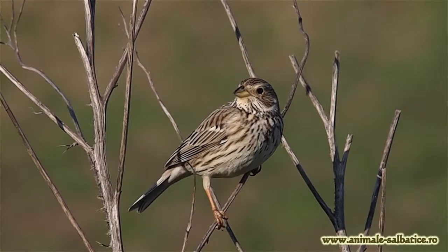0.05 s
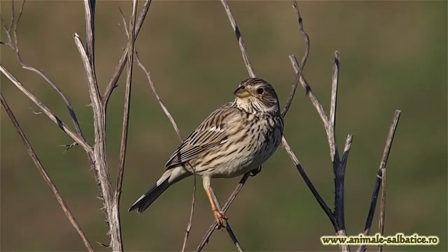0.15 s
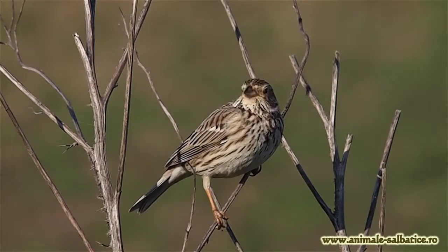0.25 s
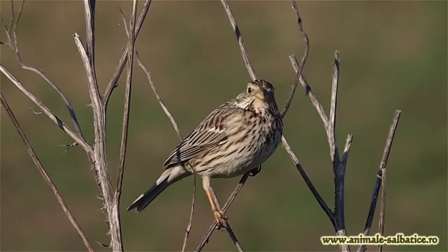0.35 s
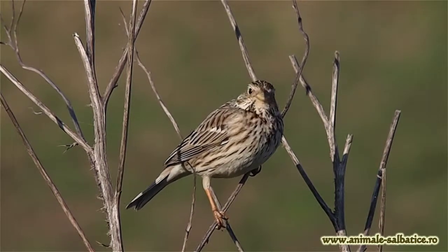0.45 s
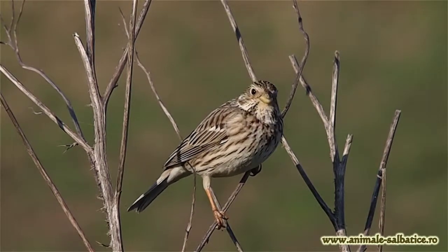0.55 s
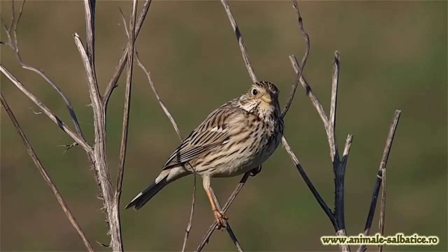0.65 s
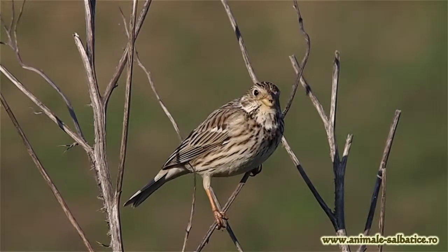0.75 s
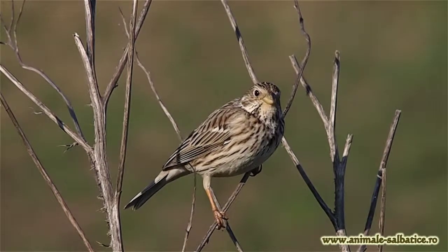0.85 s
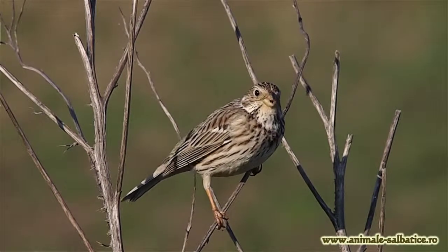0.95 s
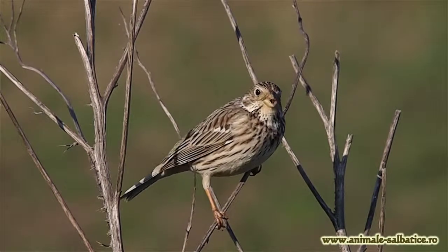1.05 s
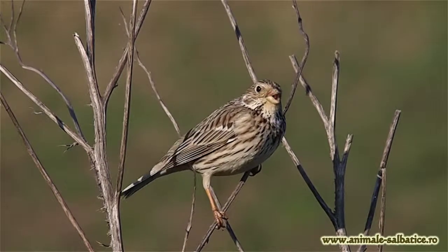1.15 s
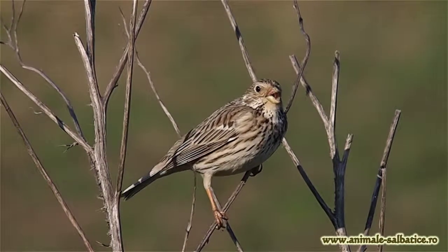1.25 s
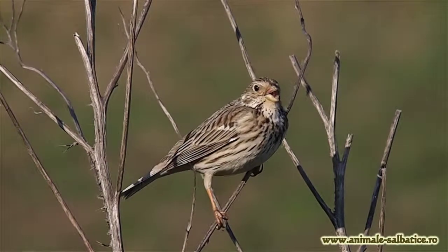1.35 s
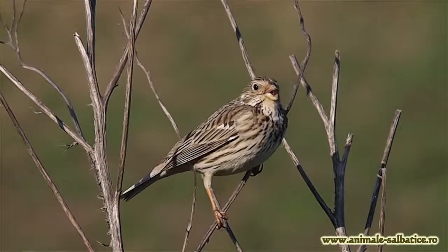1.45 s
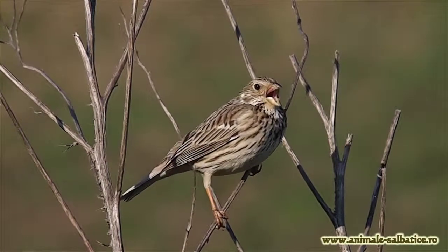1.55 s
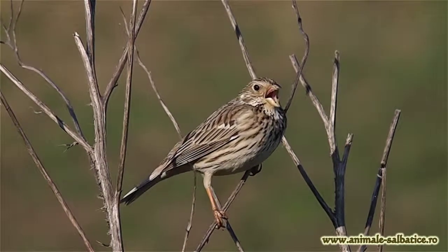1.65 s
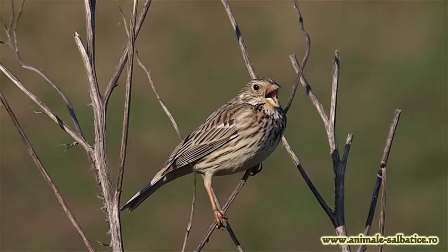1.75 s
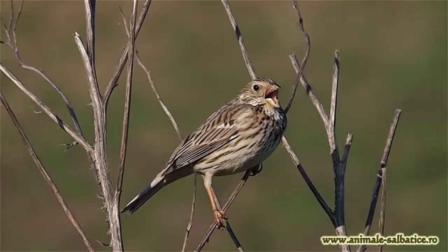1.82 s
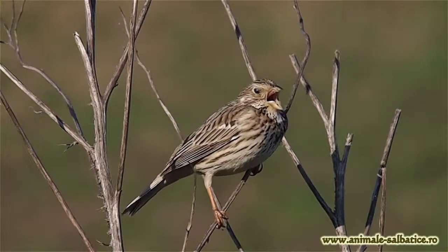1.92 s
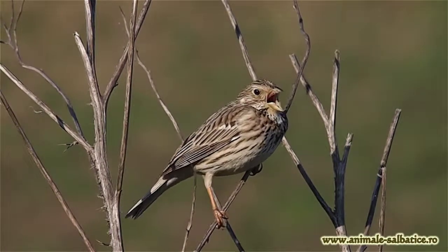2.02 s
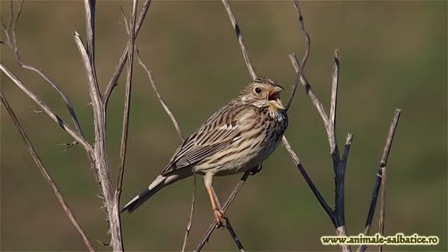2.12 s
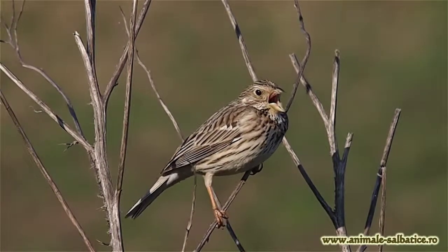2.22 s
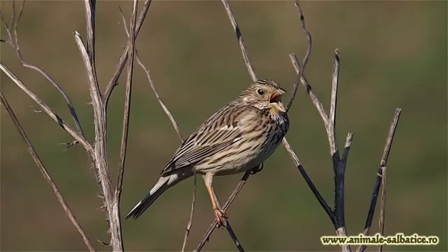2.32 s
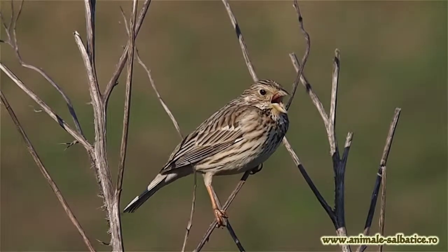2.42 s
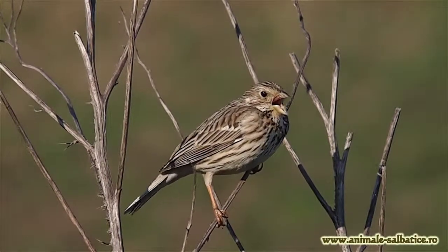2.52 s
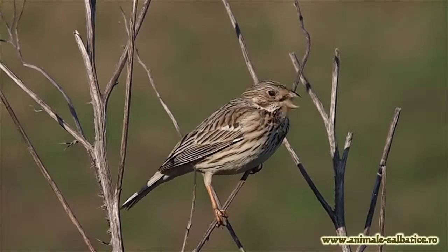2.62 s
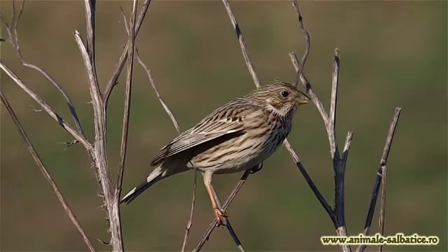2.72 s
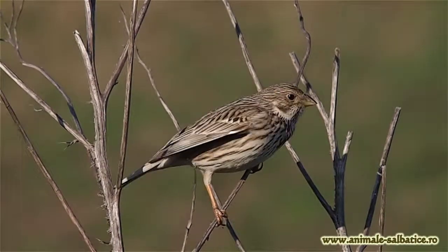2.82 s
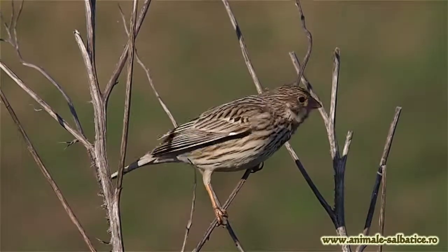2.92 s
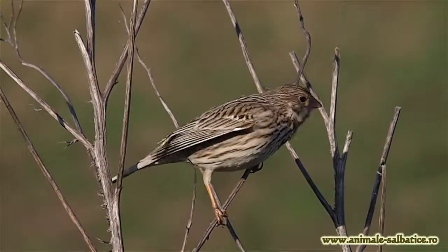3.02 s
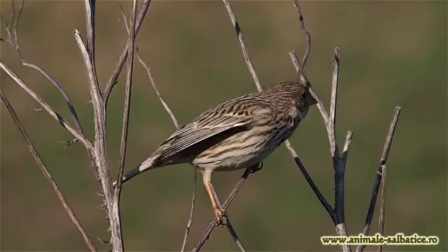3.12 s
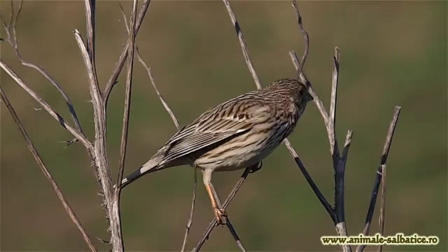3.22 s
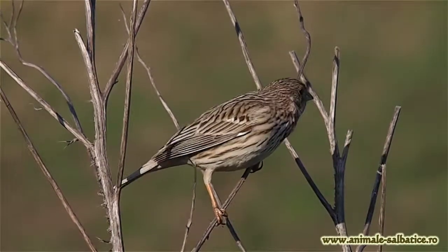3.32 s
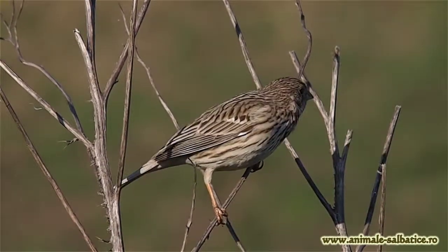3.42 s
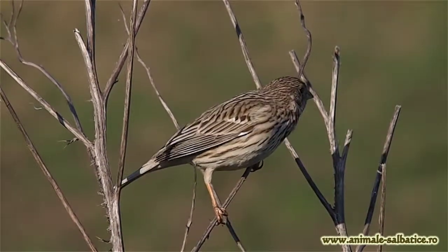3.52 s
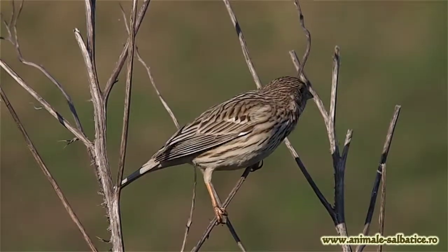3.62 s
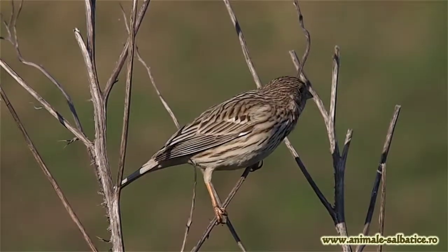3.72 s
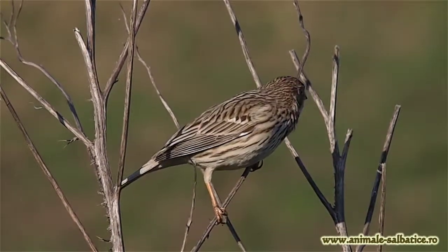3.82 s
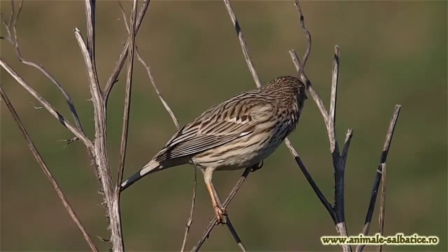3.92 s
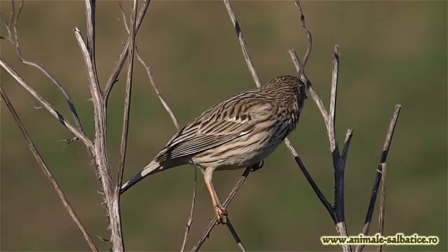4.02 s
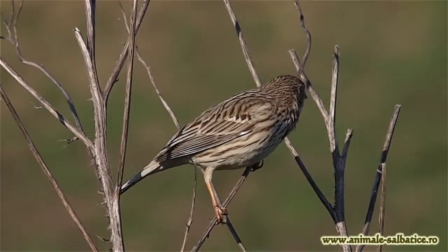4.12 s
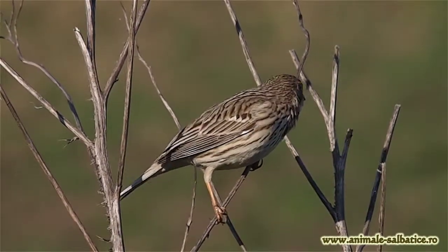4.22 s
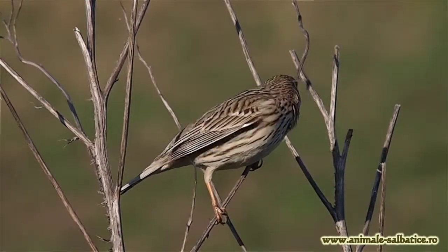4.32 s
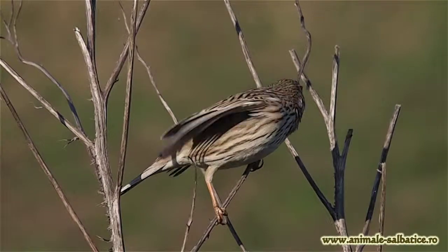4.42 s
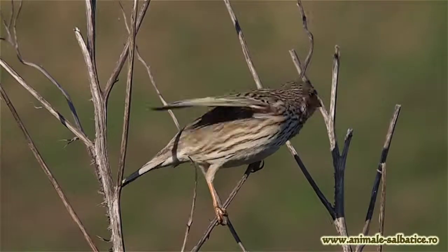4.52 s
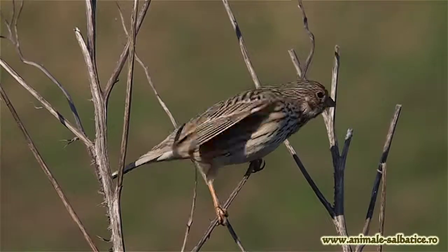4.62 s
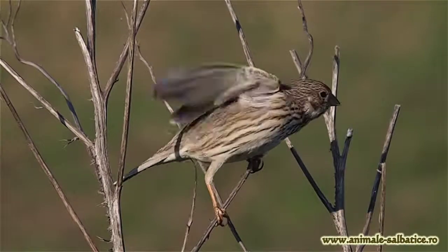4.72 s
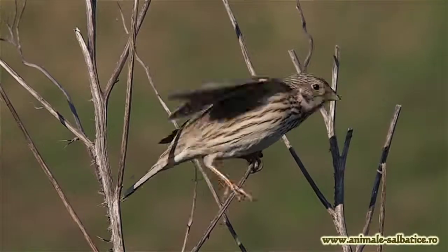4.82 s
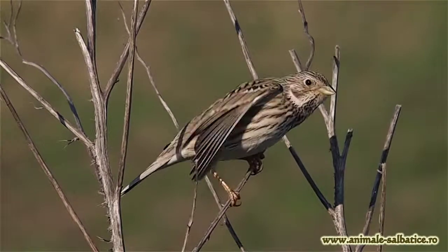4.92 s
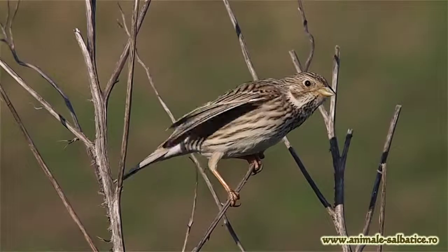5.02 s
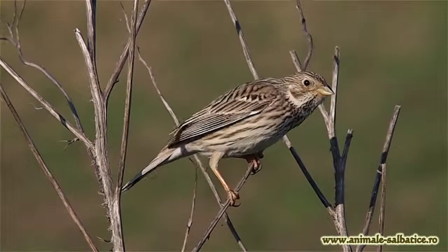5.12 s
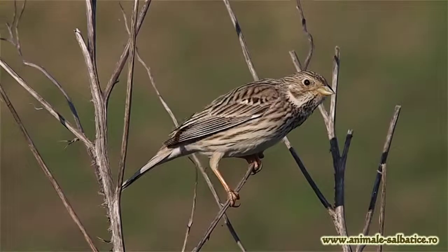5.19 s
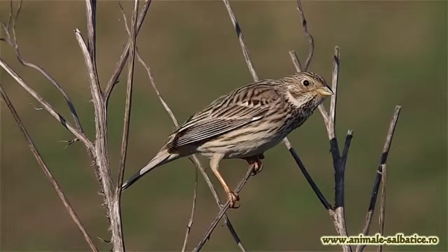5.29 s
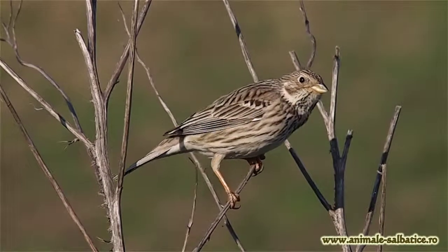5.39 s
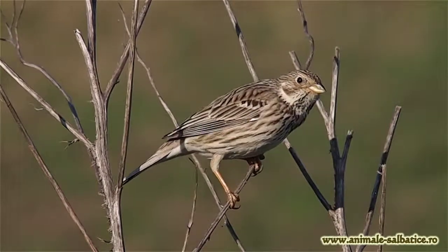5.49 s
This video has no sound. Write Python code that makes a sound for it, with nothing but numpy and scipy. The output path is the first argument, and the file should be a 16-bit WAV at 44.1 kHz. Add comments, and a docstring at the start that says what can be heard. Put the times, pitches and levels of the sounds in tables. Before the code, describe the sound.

A small bird sings one high song, quickening ticks breaking into a fast jangle, over soft air and faint distant birds.

```python
"""A corn bunting sings once in an open field: tick-and-whistle notes that get quicker and louder, then a
jangle of very fast falls, rises and stutters with two trills, fading out in a few thin chips.
Its voice box (the syrinx) has two sides: one alone gives a clean tone, both together sound hoarse.
The song echoes off the stalks and the field. Far birds call over a soft rush of air and microphone
hiss, and a limiter turns the sound down at the loudest notes."""
import sys
import numpy as np
from scipy import signal
from scipy.fft import rfft, irfft, next_fast_len
from scipy.io import wavfile
from scipy.ndimage import uniform_filter1d, map_coordinates

SR = 44100
rng = np.random.default_rng(int(sys.argv[2]) if len(sys.argv) > 2 else 0)


def inscribe(sig):
    """Save sig as 16-bit PCM at rate SR to the path in sys.argv[1].

    A 1-D sig is mono; a 2-D sig holds one channel per row.
    Samples are clipped to [-1, 1] before scaling.
    """
    pcm = np.round(np.clip(np.atleast_2d(sig).T, -1, 1) * 32767)
    wavfile.write(sys.argv[1], SR, pcm.astype(np.int16))


N = 244755
SPLIT_HZ, TOP_HZ = 4000, 15300  # where the air gives way to the hiss; upper edge of all sound


def bunting(rasp_db=-7):
    """The whole song. Notes flare as they slide through a resonance; noise rides on the hoarse ones."""
    # one note of each trill: (time into the note [s], pitch [Hz], level [dB])
    fast_note = [(0, 7120, -47), (.002, 6990, -2.5), (.0045, 6525, -0.5), (.0065, 6410, -0.5),
                 (.0078, 5340, -9.5), (.0095, 4930, -11)]
    slow_note = [(0, 8000, -22), (.002, 7600, -0.5), (.006, 7380, 3), (.0085, 6610, -1), (0.01, 6400, -2.5),
                 (0.01, 5640, -11), (0.0135, 5640, -4.5)]
    # resonances that colour the song: (centre [Hz], width [Hz], level [dB])
    resonances = [(4420, 310, -12), (5656, 302, -7), (6717, 380, -3), (7600, 287, -3.5)]
    # colour of the rasping noise: (frequency [Hz], level [dB])
    rasp_colour = [(1500, -11), (3600, -36), (4700, -2.5), (5500, 16), (8700, -25.5), (10300, 3),
                   (11800, -3), (15000, -12)]
    fast = trill(fast_note, start_s=1.6167, period_s=0.01, count=11, second=0.67, under_db=-18.5)
    slow = trill(slow_note, start_s=1.9943, period_s=0.01755, count=7, second=0.53, under_db=-17.5)
    track = np.zeros((3, N))
    for s, db, sound in opening() + jangle() + fast + slow:  # a note is (time [s], level [dB], sound)
        add(track, s, amp(db) * sound)
    tone, overtones, hoarseness = track
    body = lambda f: sum(amp(db) * 1j * f * width / (hz * hz - f * f + 1j * f * width)
                         for hz, width, db in resonances)
    rasp = amp(rasp_db) * hoarseness * noise(rasp_colour, 1250, TOP_HZ)
    return filtered(tone, body) + overtones + rasp


def syrinx(pitch, second, apart_hz=850, flutter=0.34, octave_db=-40):
    """The voice box, as rows: tone, weak octave, hoarseness. second (0-1) mixes in its second side."""
    share = np.clip(second, 0, 1) * np.ones(len(pitch))
    hoarseness = share ** 2
    phase = phase_of(pitch, jitter=0.003 + 0.06 * hoarseness)
    # the second side sounds a little higher, unsteadily, and beats with the first
    other_side = np.sin(phase_of(pitch + apart_hz, jitter=0.044))
    other_side *= 1 + flutter * wobble(1500, size=len(pitch))
    tone = np.sqrt(1 - hoarseness) * np.sin(phase) + share * other_side
    return np.array([tone, amp(octave_db) * np.sin(2 * phase), hoarseness])


def opening():
    """With more effort the ticks get louder and higher, the whistle earlier, longer and higher."""
    # each a double tick and a whistle: (time [s], effort [0-1], whistle level [dB])
    opening_notes = [(0.5599, 0.09, -22.5), (0.7739, 0.34, -13), (0.9516, 0.49, -10.5), (1.114, .73, -8),
                     (1.2475, 0.88, -6.5), (1.3659, 1, -7), (1.4726, 1, -7.5)]
    notes = []
    for s, effort, db in opening_notes:
        by_effort = lambda soft, hard: soft + effort * (hard - soft)
        notes += double_tick(s, hz=by_effort(5320, 6265), db=by_effort(-28, -3.5))
        sound = whistle(length=by_effort(0.0205, 0.031), start_hz=by_effort(3740, 3930),
                        middle_hz=by_effort(3684, 4444), end_hz=by_effort(4240, 4610), db=db)
        notes.append((s + by_effort(0.017, 0.0106), db, sound))
    return notes


def whistle(length, start_hz, middle_hz, end_hz, db, octave_db=-35, third_db=-22, hook_hz=450):
    """A clean rising whistle that swells, then stops with a small downward hook."""
    pitch, puff = arc(length, start_hz, middle_hz, end_hz, taper=0.53, lean=1.4)
    time_left = np.arange(len(pitch))[::-1] / SR
    hook = hook_hz * np.exp(-time_left / 0.0015)
    phase = phase_of(pitch - hook, jitter=0.0065)
    # the overtone at three times the pitch appears only as the bird sings harder
    overtones = amp(octave_db) * np.sin(2 * phase) + amp(third_db + 2 * db) * np.sin(3 * phase)
    return puff * np.array([np.sin(phase), overtones, np.zeros(len(phase))])


def tick(hz, fall_hz=1900, length=0.0022):
    """A downward sweep so short that it sounds like a tick."""
    pitch, puff = arc(length, hz + fall_hz / 2, hz, hz - fall_hz / 2, taper=0.54)
    return puff * syrinx(pitch, second=0.077)


def double_tick(s, hz, db, gap_s=0.0029, first_db=-3):
    """Two ticks, the first one weaker."""
    return [(s, db + first_db, tick(hz)), (s + gap_s, db, tick(hz))]


def jangle():
    """All the quick notes after the opening, apart from the trills."""
    # double ticks, each followed by a softer burr: (time [s], level [dB])
    ticks = [(1.5653, -4.5), (1.7694, -6), (1.7788, -3.5), (1.787, -7.5), (1.795, -3.5), (1.8032, -1.5)]
    # rising notes: (time [s], length [s], start [Hz], end [Hz], level [dB], second side [0-1])
    rises = [(1.606, 0.0091, 5200, 6360, -5, 0.17), (1.819, 0.016, 5170, 8470, 1, 0.3),
             (1.949, .014, 5200, 8020, -2, 0.23), (2.469, 0.019, 5320, 7600, -3, 0.1),
             (2.512, .0185, 5630, 8330, 0.5, 0.12), (2.734, .018, 4820, 7230, -24, .12)]
    # hoarse low notes: (time [s], length [s], pitch [Hz], slide [Hz], level [dB])
    burrs = [(1.58, 0.012, 5400, 695, -12), (1.839, 0.0088, 5290, -600, -7.5),
             (1.847, 0.015, 5380, 800, -8.5), (1.862, 0.011, 5330, 300, -8),
             (1.893, 0.018, 4640, 446, -13.5), (1.909, 0.017, 5250, -400, -15),
             (1.926, .007, 5360, -50, -5.5), (1.936, 0.013, 5350, -600, -9.5),
             (1.961, 0.017, 4820, -400, -8.5), (1.98, .013, 5330, -250, -6)]
    # closing chips that dip and come back up: (time [s], length [s], low pitch [Hz], level [dB])
    chips = [(2.5647, 0.0093, 7460, 0.5), (2.6169, .0115, 7690, -3.5), (2.6708, .011, 7670, -10),
             (2.786, 0.017, 5840, -17), (2.847, 0.012, 7310, -25.5)]
    notes = crossings() + falls() + stutters()
    for s, db in ticks:
        notes += double_tick(s, hz=6550, db=db)
        notes.append((s + 0.0024, db - 6, burr(length=0.0062, hz=5310, slide_hz=-500)))
    for s, length, start_hz, end_hz, db, second in rises:
        notes.append((s, db, rise(length, start_hz, end_hz, second, curl=2.8, low_db=-4.5)))
    for s, length, hz, slide_hz, db in burrs:
        notes.append((s, db, burr(length, hz, slide_hz)))
    for s, length, hz, db in chips:
        notes.append((s, db, glide(length, hz + 1100, hz, hz + 950, second=0.05, lean=0.97)))
    return notes


def crossings(length=0.0091, lag_s=0.003):
    """The high voice comes down; a moment later the low voice climbs through it."""
    # pairs of crossing notes: (time [s], level [dB])
    pairs = [(1.5858, -2.5), (1.744, -1), (1.8798, 0)]
    notes = []
    for s, db in pairs:
        down = glide(length, start_hz=7880, middle_hz=6940, end_hz=6850, second=0.11, lean=0.64)
        up = glide(length, start_hz=5160, middle_hz=6460, end_hz=8000, second=0.18, lean=1.16)
        notes += [(s, db, down), (s + lag_s, db, up)]
    return notes


def falls(held_db=-7, held_hz=5920, overlap_s=0.002):
    """Each fall steepens on its way down; some land on a softer held tone."""
    # falling notes: (time [s], length [s], start [Hz], end [Hz], level [dB], held tone [s])
    falling_notes = [(1.905, 0.0054, 7600, 7200, -7.5, 0), (1.911, 0.0039, 7600, 6460, -5, 0.0012),
                     (1.92, .006, 7900, 6800, -8, 0), (1.9346, 0.0046, 7920, 5800, -5, 0),
                     (1.977, 0.0036, 7950, 6130, -6, 0.0011), (2.1541, .0125, 8300, 6050, -1, 0.002),
                     (2.236, 0.012, 8454, 5920, 1, .008), (2.2666, 0.011, 8620, 5800, 0.5, 0.0096),
                     (2.38, 0.011, 8350, 5800, 1, 0.0107), (2.419, 0.014, 8360, 5900, -0.5, 0.0087),
                     (2.504, 0.0084, 8340, 6600, -4, 0.015)]
    notes = []
    for s, length, start_hz, end_hz, db, held_s in falling_notes:
        middle_hz = start_hz + 0.34 * (end_hz - start_hz)
        notes.append((s, db, glide(length, start_hz, middle_hz, end_hz, second=0.12, lean=1.2)))
        if held_s > 0:
            held = glide(held_s + overlap_s, held_hz, held_hz, held_hz, second=0.046, lean=0.5)
            notes.append((s + length - overlap_s, db + held_db, held))
    return notes


def stutters(tick_count=3, gap_s=0.0036, rise_delay_s=0.0048):
    """Evenly spaced ticks run into a rising note."""
    # stuttered notes: (time [s], length [s], tick level [dB], rise level [dB],
    # rise start [Hz], rise end [Hz], second side [0-1])
    stuttered_notes = [(2.1712, .0215, -12, 0, 5380, 7180, 0.22), (2.202, 0.017, -4, 0.5, 5480, 7230, .25),
                       (2.2862, 0.019, -13, -0.5, 5400, 7960, 0.27),
                       (2.3149, .018, -5.5, -0.5, 5500, 8520, 0.16),
                       (2.3422, 0.017, -7, 1, 5650, 8400, 0.24)]
    notes = []
    for s, length, tick_db, rise_db, start_hz, end_hz, second in stuttered_notes:
        notes += [(s + i * gap_s, tick_db, tick(hz=6910)) for i in range(tick_count)]
        sound = rise(length - rise_delay_s, start_hz, end_hz, second, curl=3.4, low_db=-5.5)
        notes.append((s + rise_delay_s, rise_db, sound))
    return notes


def trill(note, start_s, period_s, count, second, under_db, pitch_spread=0.0148):
    """A falling note repeats, never quite alike, and roughens as it falls; a soft voice rises under it."""
    times, hz, db = np.transpose(note)
    length = times[-1]
    t = np.arange(round(length * SR)) / SR
    puff = amp(np.interp(t, times, db)) * signal.windows.tukey(len(t), 0.15)
    notes = []
    for s in start_s + period_s * np.arange(count):
        pitch = np.interp(t, times, hz) * (1 + pitch_spread * rng.standard_normal())
        high = puff * syrinx(pitch, second * (t / t[-1]) ** 2)
        low = glide(length, start_hz=4320, middle_hz=4720, end_hz=5480, second=0.29, lean=2.2)
        notes += [(s, 0, high), (s, under_db, low)]
    return notes


def rise(length, start_hz, end_hz, second, curl, low_db):
    """Swells on its low pitch, then hooks upward with a push of air; more curl makes the hook later."""
    progress = np.linspace(0, 1, round(length * SR))
    push = np.exp(-((progress - 0.78) / 0.16) ** 2)
    fade_in, fade_out = progress / 0.45, (1 - progress) / 0.12
    puff = amp(low_db * (1 - push)) * np.minimum(1, np.minimum(fade_in, fade_out))
    pitch = start_hz + (end_hz - start_hz) * progress ** curl
    return puff * syrinx(pitch, second)


def burr(length, hz, slide_hz):
    """A short hoarse slide of the low voice."""
    return glide(length, hz - slide_hz / 2, hz, hz + slide_hz / 2, second=0.34, lean=1.36)


def glide(length, start_hz, middle_hz, end_hz, second, lean):
    """One sliding note, sung on a single puff of air."""
    pitch, puff = arc(length, start_hz, middle_hz, end_hz, taper=0.75, lean=lean)
    return puff * syrinx(pitch, second)


def echoes(x, decay_s, delay_s):
    """Many tiny reflections that start after a delay and fade by 60 dB in decay_s."""
    t = np.arange(SR // 2) / SR
    tail = rng.standard_normal(len(t)) * amp(-60 * t / decay_s) * (t > delay_s)
    return signal.fftconvolve(x, tail / np.linalg.norm(tail))[:N]


def far_birds():
    """Faint sliding calls from across the field."""
    # far calls: (time [s], length [s], middle pitch [Hz], slide [Hz], level [dB])
    calls = [(.062, 0.011, 7460, -900, -49.5), (0.11, .016, 4530, -800, -59), (.673, 0.029, 3670, 980, -59),
             (4.14, .021, 3850, 890, -54), (4.222, .025, 2760, -100, -58), (4.315, 0.013, 2800, -60, -51.5),
             (4.368, .018, 4670, -900, -60.5), (4.415, 0.016, 6040, 900, -59),
             (4.53, .009, 7900, -570, -53), (4.598, .016, 7660, -1100, -48.5),
             (4.695, .019, 2430, -900, -55), (4.776, .032, 2300, -1700, -55.5),
             (4.936, 0.028, 4035, 1200, -57)]
    track = np.zeros(N)
    for s, length, hz, slide_hz, db in calls:
        pitch, puff = arc(length, hz - slide_hz / 2, hz, hz + slide_hz / 2, taper=0.21)
        add(track, s, amp(db) * puff * np.sin(phase_of(pitch, jitter=0.049)))
    return track


def far_rasps(buzz_hz=130):
    """Hoarse far birds: short bursts of noise that pulse fast enough to buzz."""
    # hoarse calls: (time [s], length [s], level [dB])
    calls = [(4.217, 0.022, -56.5), (4.3, 0.053, -60), (5.368, 0.11, -60.5), (5.44, 0.032, -63),
             (5.52, .028, -57.5)]
    # their colour: (frequency [Hz], level [dB])
    colour = [(1200, -10), (1700, 1.5), (2300, -8.5), (2800, -0.5), (3200, -17)]
    loudness = np.zeros(N)
    for s, length, db in calls:
        add(loudness, s, amp(db) * signal.windows.tukey(round(length * SR), 0.5))
    buzz = 1 + np.sin(phase_of(np.full(N, buzz_hz), jitter=0.17))
    return loudness * unit(buzz * noise(colour, 1000, 3600))


def rushing_air():
    """A soft low rush of air that swells slightly as the song ends."""
    # colour of the air: (frequency [Hz], level [dB])
    colour = [(15, -37), (25, -5.5), (53, -1), (109, 0.5), (142, -1.5), (181, -1), (257, -3.5), (344, -5),
              (543, -8.5), (769, -10), (833, -10.5), (2780, -16.5), (5010, -24), (7480, -21), (15000, -16)]
    # its loudness: (time [s], level [dB])
    levels = [(0, -52.5), (2.45, -52.5), (2.95, -51.5), (3.6, -52.5), (5.55, -52.5)]
    db = np.interp(np.arange(N) / SR, *np.transpose(levels))
    return amp(db) * noise(colour, 13.8, SPLIT_HZ)


def microphone_hiss(db=-54):
    """The microphone's own steady, high noise."""
    # colour of the hiss: (frequency [Hz], level [dB])
    colour = [(1760, -34), (3000, -8), (4100, -6), (5090, -13), (6200, -8.5), (7450, -3.5), (8190, -2.5),
              (14300, 2), (15200, -3)]
    return amp(db) * noise(colour, SPLIT_HZ, TOP_HZ)


def limiter(x, ceiling_db=-7, release_s=0.13):
    """Turns the sound down at once on peaks and lets it back up slowly."""
    over_db = np.maximum(20 * np.log10(np.abs(x) + 1e-9) - ceiling_db, 0)
    fade = np.exp(-np.arange(N) / SR / release_s)
    held_db = np.maximum.accumulate(over_db / fade) * fade
    return x * amp(-uniform_filter1d(held_db, size=32))


def side_tones(x, other_rate_hz=48000, ripple_db=-7.5):
    """Changing sample rate along straight lines errs most between samples: high notes gain side tones."""
    between = np.arange(N) * (other_rate_hz - SR) / SR % 1
    curvature = np.convolve(x, [1, -2, 1], "same")
    error = between * (1 - between)
    return x + amp(ripple_db) * curvature * (error - error.mean())


def arc(length, start_hz, middle_hz, end_hz, taper, lean=1):
    """A pitch bent through three points, and its puff of air; lean over 1 makes the puff peak late."""
    progress = np.linspace(0, 1, max(round(length * SR), 8))
    curve = np.polyfit([0, 0.5, 1], [start_hz, middle_hz, end_hz], 2)
    puff = np.abs(np.sin(np.pi * progress ** lean)) ** taper
    return np.polyval(curve, progress), puff


def phase_of(pitch, jitter):
    """How far a vibration has turned, in radians; jitter makes its pitch unsteady."""
    unsteady_pitch = pitch * (1 + jitter * wobble(1540, size=len(pitch)))
    return 2 * np.pi * np.cumsum(unsteady_pitch) / SR


def wobble(rate, size):
    """A smooth curve through random points, rate of them a second."""
    return map_coordinates(rng.standard_normal(int(size * rate / SR) + 4), [np.arange(size) * rate / SR])


def noise(colour, low_hz, high_hz):
    """Noise of strength 1 with the given colour between two frequencies."""
    hz, db = np.transpose(colour)
    gain = lambda f: amp(np.interp(np.log(f + 1), np.log(hz), db)) * (f > low_hz) * (f < high_hz)
    return unit(filtered(rng.standard_normal(N), gain))


def filtered(x, response):
    """Multiplies each frequency in a sound by response(frequency)."""
    size = next_fast_len(N + SR // 2)
    return irfft(rfft(x, size) * response(np.fft.rfftfreq(size, 1 / SR)), size)[:N]


def add(track, s, sound):
    """Mixes a sound into a track at s seconds."""
    track[..., round(s * SR):][..., :sound.shape[-1]] += sound


def amp(db):
    """Turns decibels into a multiplier."""
    return 10 ** (np.asarray(db) / 20)


def unit(x):
    """Scales a sound to an average strength (rms) of 1."""
    return x / np.sqrt(np.mean(x ** 2) + 1e-20)


def scene(song_db=1):
    """The song, its echoes from near stalks and the open field, and the background."""
    song = amp(song_db) * bunting()
    stalks = amp(-15) * echoes(song, decay_s=0.048, delay_s=0.0026)
    field = amp(-43) * echoes(song, decay_s=1.0, delay_s=0.043)
    background = rushing_air() + microphone_hiss() + far_birds() + far_rasps()
    return (song + stalks + field + background)[None]


def record(dry):
    """Limits the peaks, adds faint side tones and cuts off the highest treble."""
    return filtered(side_tones(limiter(dry[0])), lambda hz: hz < TOP_HZ)[None]


dry = scene()
out = record(dry)
inscribe(out)
```